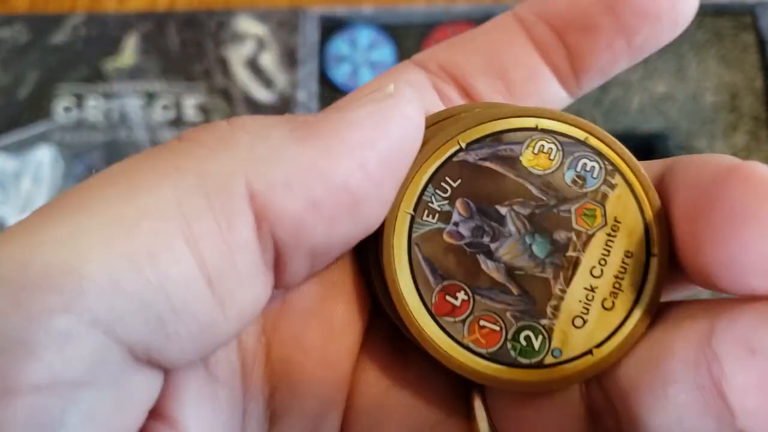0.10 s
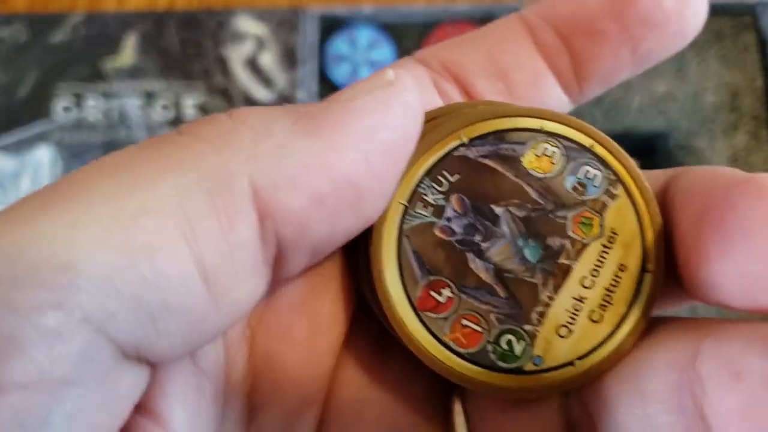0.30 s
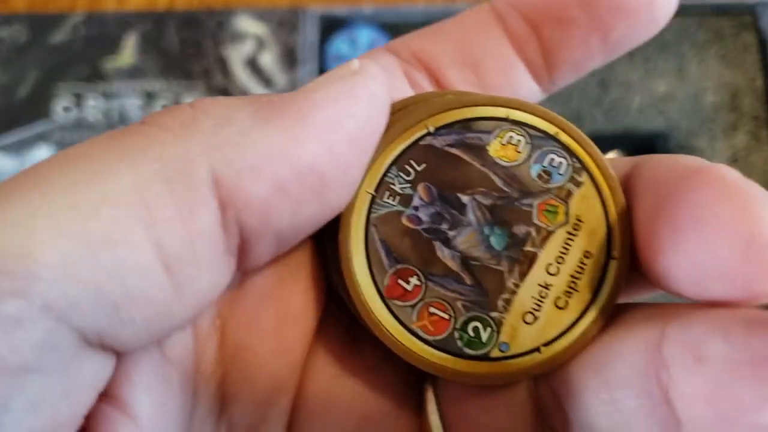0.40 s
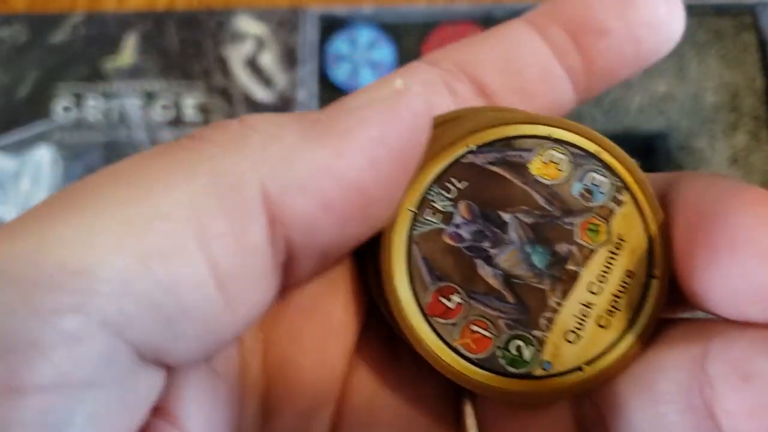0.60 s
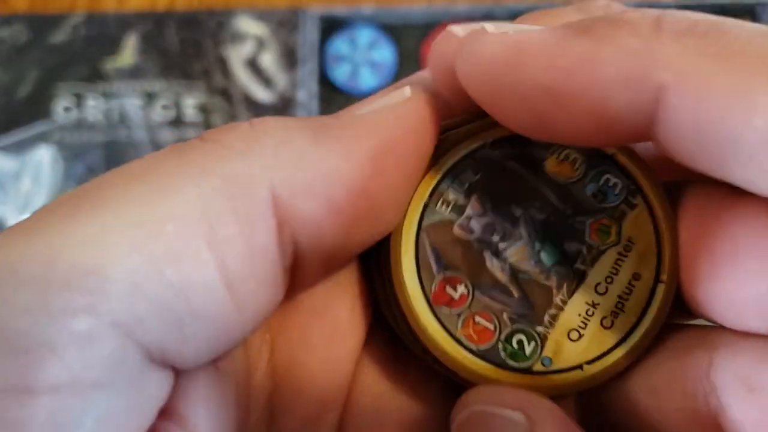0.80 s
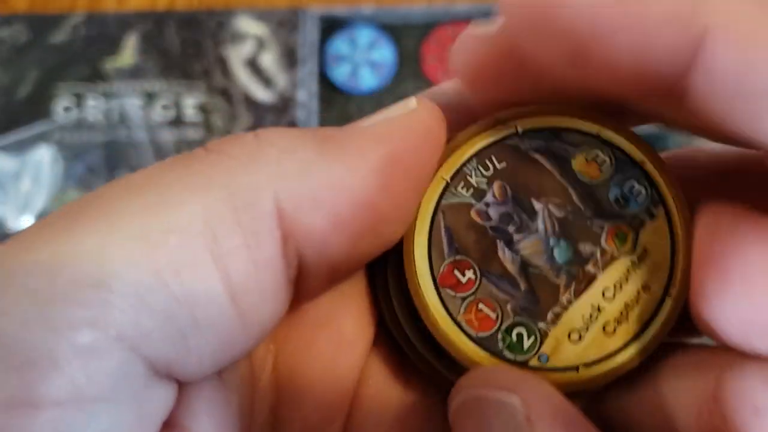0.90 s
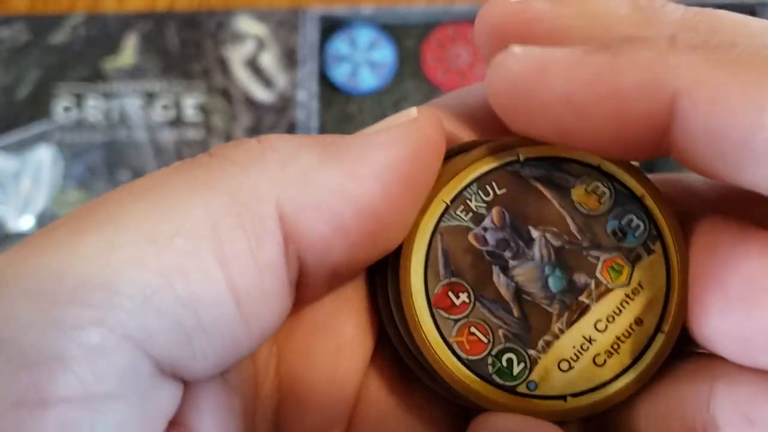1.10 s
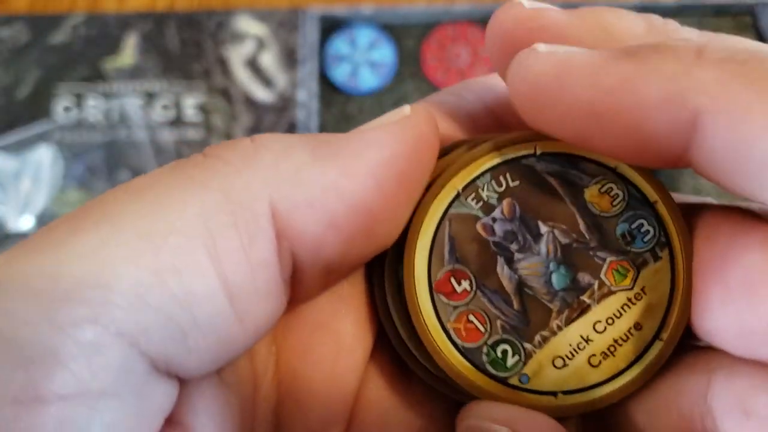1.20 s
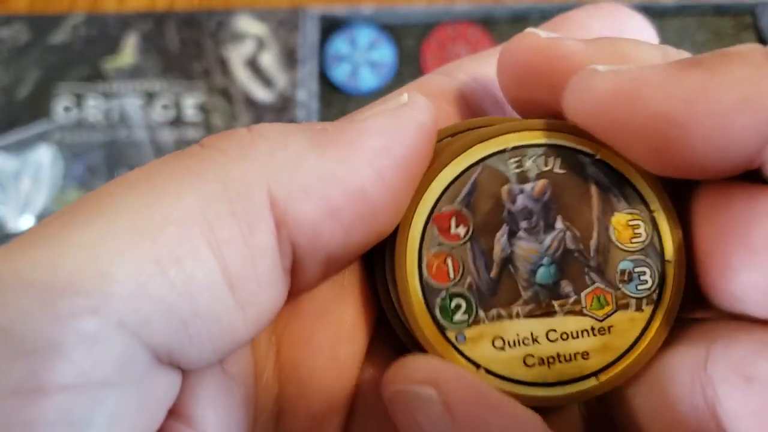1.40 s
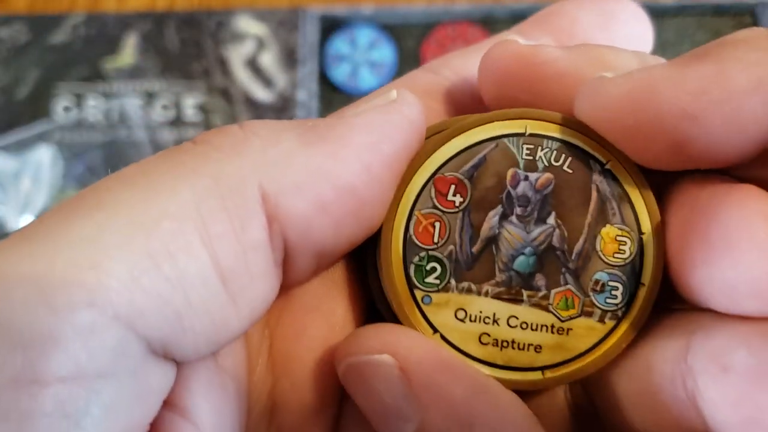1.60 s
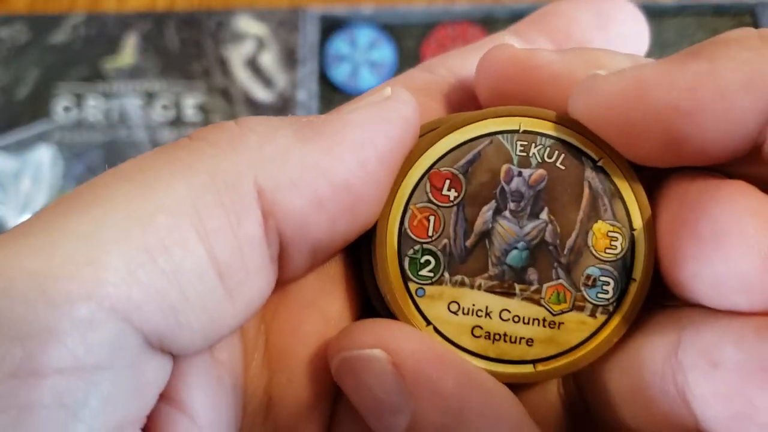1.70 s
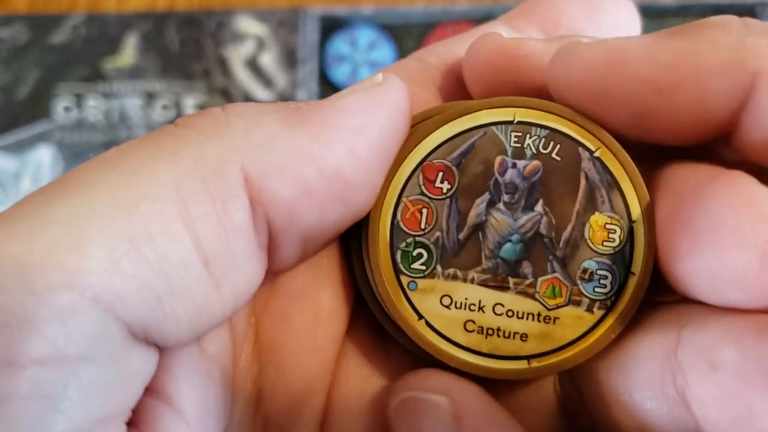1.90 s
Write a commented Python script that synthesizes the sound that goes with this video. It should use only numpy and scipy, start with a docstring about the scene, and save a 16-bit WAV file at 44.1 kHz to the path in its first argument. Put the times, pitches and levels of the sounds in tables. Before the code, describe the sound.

Close up indoors, a heavy plastic chip clacks and chatters to rest on a resonant tabletop; afterwards come very soft rasps of stacked chips, a tiny tick, a finger brush and a sharp short click near the end.

```python
"""A thick plastic chip drops on a table, clacks and rattles to rest: shaped noise bursts and decaying tones.
The table and the room ring on, a low boom swells and dull knocks follow as the chip rocks.
Then chips in a hand-held stack slide softly, with one tiny tick, as grains of noise through resonances,
and a few click together. Fingers brush the stack as swelling hiss, over a low room rumble of coloured
noise and a faint hum."""
import sys
import numpy as np
from scipy import signal
from scipy.fft import rfft, irfft, next_fast_len
from scipy.io import wavfile
from scipy.ndimage import map_coordinates

SR = 44100
rng = np.random.default_rng(int(sys.argv[2]) if len(sys.argv) > 2 else 0)


def inscribe(sig):
    """Save sig as 16-bit PCM at rate SR to the path in sys.argv[1].

    A 1-D sig is mono; a 2-D sig holds one channel per row.
    Samples are clipped to [-1, 1] before scaling.
    """
    pcm = np.round(np.clip(np.atleast_2d(sig).T, -1, 1) * 32767)
    wavfile.write(sys.argv[1], SR, pcm.astype(np.int16))


N = 83790  # length in samples
T = np.arange(N) / SR  # time [s]
M = next_fast_len(N + SR)  # filter length, with spare room for tails
F = np.fft.rfftfreq(M, 1 / SR)  # frequency [Hz]


def amp(db):
    """Turn decibels into gain."""
    return 10 ** (np.asarray(db) / 20)


def unit(x):
    """Scale to an rms of 1."""
    return x / np.sqrt(np.mean(x ** 2) + 1e-20)


def along(points, hz):
    """Read a curve of (Hz, value) points, joined on a log frequency axis."""
    f, v = np.transpose(points)
    return np.interp(np.log(hz + 1), np.log(f + 1), v)


def pan(db):
    """Gains of left and right; positive dB leans left."""
    return amp(np.array([db, -db]) / 2).reshape(2, -1)


def sine(hz, t):
    """A pure tone."""
    return np.sin(2 * np.pi * hz * t)


def add(track, s, sound):
    """Mix a sound into the track at time s."""
    part = track[:, round(s * SR):][:, :sound.shape[-1]]
    part += sound[..., :part.shape[1]]


def filtered(x, response):
    """Pass x through a frequency response."""
    return irfft(rfft(x, M) * response, M)[..., :N]


def peak(hz, width):
    """Gain curve of one resonance."""
    return 1 / (1 + ((F - hz) / width) ** 2)


def causal(gain):
    """Give a gain curve unit energy and minimum phase, so that it rings only after it is struck."""
    c = irfft(np.log(np.maximum(unit(gain), 1e-6)), M)
    c[1:M // 2] *= 2
    c[M // 2 + 1:] = 0
    return np.exp(rfft(c))


# How alike left and right are: (frequency [Hz], likeness [0 to 1])
LIKENESS = [(60, 0.95), (250, 0.92), (600, 0.58), (1200, 0.079), (4000, 0.03), (12000, 0.028)]


def pair(size):
    """White stereo noise: waves from all around are alike in the bass and unrelated in the treble."""
    likeness = along(LIKENESS, np.fft.rfftfreq(size, 1 / SR))
    turn = np.arccos(np.clip(likeness, -1, 1)) / 2
    noise = rfft(rng.standard_normal((2, size)))
    mid, side = irfft(noise * [np.cos(turn), np.sin(turn)], size)
    return np.array([mid + side, mid - side])


def rush(spectrum):
    """Steady coloured stereo noise with an rms of 1."""
    return unit(filtered(pair(size=N), amp(along(spectrum, F))))


# How long the room rings: (frequency [Hz], time to fall 60 dB [s])
ROOM_DECAY = [(100, 0.58), (350, 0.29), (1200, 0.3), (2700, 0.23), (7000, 0.28), (14000, 0.26)]
ROOM_RISE_S = 0.0052


def room():
    """A fresh room tail of unit energy: noise in which each frequency dies at its own speed."""
    hz, t, z = signal.stft(pair(size=32768), SR, nperseg=256)
    fade = amp(-60 * t / along(ROOM_DECAY, hz)[:, None])
    tail = signal.istft(z * fade, SR, nperseg=256)[1]
    tail = tail * (1 - np.exp(-T[:tail.shape[1]] / ROOM_RISE_S))
    return unit(tail) / np.sqrt(tail.shape[1])


def in_room(x, wet_db):
    """A near sound with the room's answer."""
    return x + amp(wet_db) * signal.fftconvolve(x, room(), axes=1)[:, :N]


SAME_PATH = 0.72  # share of the room's energy that contacts have in common
CHATTER_RISE_S = 0.00041
GRAIN_DB, GRAIN_PER_S = 3, 1500  # unevenness of the chatter and rate of its tiny rebounds


def contact(t60, wet_db, common):
    """A hit is a short, uneven chatter of tiny rebounds and near echoes, with the room's answer."""
    tail = np.sqrt(SAME_PATH) * common + np.sqrt(1 - SAME_PATH) * room()
    t = T[:tail.shape[1]]
    rebounds = amp(GRAIN_DB * map_coordinates(rng.standard_normal(4096), [t * GRAIN_PER_S]))
    envelope = amp(-60 * t / t60) * (1 - np.exp(-t / CHATTER_RISE_S))
    chatter = pair(size=len(t)) * rebounds * envelope
    return unit(chatter) / np.sqrt(len(t)) + amp(wet_db) * tail


# Contacts of the dropped chip:
# (time [s], relative clack level [dB], relative table knock level [dB], left over right [dB])
DROPS = [(0.213, -22.5, -20, 6), (0.2217, -29.5, -26.5, -6), (0.2278, -35, -25.5, -7),
         (0.2368, -26.5, -23, 10), (0.2587, -14.5, -19.5, 0), (0.2652, -10, -19, 3),
         (0.2868, -22.5, -26, -4), (0.2998, -19, -24.5, 13), (0.3168, -28, -29.5, 6),
         (0.331, -30, -25.5, -2), (0.3427, -32.5, -22.5, -13), (0.3615, -29.5, -26.5, 0),
         (0.3858, -28, -22.5, 2.5), (0.4134, -27, -29.5, -9), (0.4172, -25, -25, -13),
         (0.4203, -25.5, -27, 12), (0.4367, -25.5, -24.5, -1), (0.4448, -33, -26, 8), (0.4668, -34, -32, 9),
         (.4760, -64, -31, 5), (0.4845, -34.5, -31, 3.5), (.503, -42.5, -39, -3)]
# Colour of the table knock: (frequency [Hz], relative level [dB])
KNOCK = [(30, -41.5), (50, -23), (70, -8.5), (100, -14.5), (150, -8.5), (330, -2), (520, -5), (720, -1.5),
         (1000, -7.5), (1230, -4), (1500, -8), (2050, -4.5), (2750, -8), (3800, -15.5), (5300, -12.5),
         (8500, -33), (14000, -47), (15500, -71.5)]
# Duller tone of flat landings: (frequency [Hz], gain [dB])
FLAT_TONE = [(400, 3), (1300, 2), (2300, -6), (3800, -6.5), (5500, -6.5), (6700, 3.5), (8300, -7.5),
             (14000, -7)]
# Side the table is heard on: (frequency [Hz], left over right [dB])
TABLE_LEAN = [(100, 0.5), (700, .5), (1300, 0.5), (2400, 2), (4400, 2), (15000, -3)]
CLACK_DB, CLACK_T60_S, CLACK_WET_DB = 16, 0.025, -2.5
KNOCK_DB, KNOCK_T60_S, KNOCK_WET_DB = 18, 0.044, 2
EDGE_S, FLAT_CRACK_DB = 0.25, -7  # until EDGE_S the chip lands flat, with less crack


def dropped_chip():
    """Each contact rings the chip and knocks the table; the first ones land flat and sound duller."""
    flat, edge, flat_knocks, edge_knocks = np.zeros((4, 2, N))
    chip_path, table_path = room(), room()
    for s, clack_db, knock_db, pan_db in DROPS:
        clacks, knocks = (flat, flat_knocks) if s < EDGE_S else (edge, edge_knocks)
        clack = contact(CLACK_T60_S, CLACK_WET_DB, chip_path)
        add(clacks, s, amp(clack_db + CLACK_DB) * pan(pan_db) * clack)
        knock = contact(KNOCK_T60_S, KNOCK_WET_DB, table_path)
        add(knocks, s, amp(knock_db + KNOCK_DB) * knock)
    dull = amp(along(FLAT_TONE, F))
    all_knocks = edge_knocks + filtered(flat_knocks, dull)
    table = filtered(all_knocks, causal(amp(along(KNOCK, F)))) + table_ring()
    chip = filtered(flat, dull * chip_colour(FLAT_CRACK_DB)) + filtered(edge, chip_colour(0))
    return chip + filtered(table, pan(along(TABLE_LEAN, F)))


# Resonances of the chip: (frequency [Hz], width [Hz], relative level [dB])
CHIP = [(4775, 200, -15.5), (5780, 86, -5), (6320, 200, -6.5), (6902, 120, 1), (7173, 120, 4),
        (9730, 330, -8.5), (11780, 610, -13)]
# Broad crack of the chip: (frequency [Hz], relative level [dB])
CRACK = [(300, -26), (1200, -17), (2500, -12), (4000, -17), (5200, -15), (6500, -14.5), (7500, -9),
         (8800, -34.5), (9800, -20.5), (14400, -24.5), (15000, -38), (16000, -44)]
# Side the chip is heard on: (frequency [Hz], left over right [dB])
CHIP_LEAN = [(1000, 3), (2500, 2), (6800, 0.5), (9800, -6.5), (13000, -0.5)]


def chip_colour(crack_db):
    """The chip's damped resonances stand out of a broad crack."""
    ring = sum((amp(db) * peak(hz, width)) ** 2 for hz, width, db in CHIP)
    crack = amp(along(CRACK, F) + crack_db)
    return causal(np.sqrt(crack ** 2 + ring)) * pan(along(CHIP_LEAN, F))


# Ways the table vibrates: (frequency [Hz], average relative level [dB], time to fall 60 dB [s])
TABLE = [(239.4, -4, 0.19), (277, -2.5, 0.14), (350.2, -1, 0.44), (408.3, -6, 0.63), (482, -9.5, 0.22),
         (556, -9, 0.16), (630, -8, .22), (686, -7, 0.35), (740, -7.5, 0.27), (859, -7.5, 0.36),
         (1247, -10, 0.19), (2000, -9.5, .16)]
TABLE_DB = -36.5
THUD_HZ, THUD_DB, THUD_T60_S = 133.9, -32.5, 0.66  # the first landing sets the table top swinging
BANG_S, BANG_HZ, BANG_DB, BANG_T60_S = 0.29, 1250, -23.5, 0.076  # one table tone rings out strongly


def table_ring():
    """Every knock sets the table's modes ringing, each a sine that dies away."""
    ring, t = np.zeros((2, N)), T[:SR]
    for s, clack_db, knock_db, pan_db in DROPS:
        modes = 0
        for hz, db, t60 in TABLE:
            level = amp(db + rng.normal(0, 1.8) - 60 * t / t60)
            modes = modes + level * np.sin(2 * np.pi * (hz * t + rng.random()))
        add(ring, s, amp(knock_db + KNOCK_DB + TABLE_DB) * modes * (1 - np.exp(-t / 0.0012)))
    thud = amp(THUD_DB - 60 * t / THUD_T60_S) * sine(THUD_HZ, t)
    add(ring, DROPS[0][0], thud * (1 - np.exp(-t / 0.003)))
    add(ring, BANG_S, amp(BANG_DB - 60 * t / BANG_T60_S) * sine(BANG_HZ, t))
    return ring


# Colour of the snap: (frequency [Hz], relative level [dB])
SNAP = [(500, -15.5), (2500, -4), (5000, -6), (7000, 7), (8600, -20), (10000, -3), (12000, -6.5),
        (14400, -8), (15200, -25)]
# The chip's clear ring, heard directly:
# (average frequency [Hz], level relative to the clack [dB], time to fall 60 dB [s])
PING = [(6380, -8, .012), (7074, -4.5, 0.025)]
SNAP_DB, SNAP_T60_S = -1, 0.0022  # the bright instant of contact
PING_SCATTER = 0.014  # share by which its pitch differs between contacts


def snaps():
    """Each contact begins with a sharp, bright burst and a short, clear ring of the chip."""
    snap, ping, t = np.zeros((2, N)), np.zeros((2, N)), T[:2048]
    for s, clack_db, knock_db, pan_db in DROPS:
        burst = unit(rng.standard_normal((2, len(t))) * amp(-60 * t / SNAP_T60_S)) / np.sqrt(len(t))
        add(snap, s, amp(SNAP_DB + clack_db) * pan(pan_db) * burst)
        pitch = 1 + PING_SCATTER * rng.standard_normal()
        tones = sum(amp(db - 60 * t / t60) * sine(hz * pitch, t) for hz, db, t60 in PING)
        add(ping, s, amp(clack_db) * pan(pan_db) * tones)
    return ping + filtered(snap, causal(amp(along(SNAP, F))) * pan(along(CHIP_LEAN, F)))


# Two low tones: (frequency [Hz], level before swell and fade [dB])
BOOM = [(307, -31.5), (347, -38.5)]
BOOM_S, BOOM_RISE_S, BOOM_T60_S = 0.345, 0.029, 0.76


def boom():
    """A low resonance of two tones builds up under the rattle, beats and outlasts it."""
    t = np.maximum(T - BOOM_S, 0)
    modes = sum(amp(db) * sine(hz, t) for hz, db in BOOM)
    return modes * (1 - np.exp(-t / BOOM_RISE_S)) * amp(-60 * t / BOOM_T60_S)


# The chip rocks dully as it comes to rest: (time [s], relative level [dB])
LATE = [(.594, -49), (0.652, -52), (0.715, -55), (0.773, -64.5), (.803, -60.5), (0.833, -66.5)]
# Colour of these knocks: (frequency [Hz], relative level [dB])
ROCK = [(150, -26), (310, -7), (410, -6.5), (600, -23), (950, -29), (1450, -31), (1750, -24.5), (2300, -28),
        (3500, -48), (9000, -45.5)]
# Their narrow ring: (frequency [Hz], width [Hz], relative level [dB])
ROCK_RING = [(1174, 63, -11), (1320, 75, -17)]
ROCK_DB, ROCK_T60_S, ROCK_WET_DB = 23, 0.084, -7


def rocking():
    """Faint knocks after the rattle: dull noise bursts with two narrow resonances."""
    out, path = np.zeros((2, N)), room()
    for s, db in LATE:
        add(out, s, amp(db + ROCK_DB) * contact(ROCK_T60_S, ROCK_WET_DB, path))
    ring = sum(amp(db) * peak(hz, width) for hz, width, db in ROCK_RING)
    return filtered(out, causal(amp(along(ROCK, F)) + ring))


# Slides and one tiny tick (at 1.091 s) in the held stack: (time [s], length before the fade [s],
# relative rim rasp level [dB], rim frequency [Hz], relative hollow body level [dB], body frequency [Hz])
STACK_MOVES = [(0.908, 0.026, -73, 4360, -59.5, 2110), (0.933, 0.011, -60, 4570, -74, 1790),
               (0.911, 0.038, -66.5, 4820, -74, 865), (0.974, 0.04, -69.5, 5010, -92, 2040),
               (1.049, 0.023, -79, 5050, -93.5, 2040), (1.091, 0.0018, -69, 7200, -88, 2090),
               (1.193, 0.024, -65.5, 4875, -70, 870), (1.413, 0.034, -71.5, 4920, -83.5, 980),
               (1.474, 0.039, -67, 5050, -75.5, 970), (1.506, 0.026, -70.5, 5070, -88, 1100),
               (1.695, 0.0081, -83, 4990, -77.5, 1150)]
# Colour of the rasp: (frequency [Hz], relative level [dB])
RASP = [(500, -28), (900, -47), (1500, -30.5), (2300, -16), (3000, -29), (4000, -21.5), (6000, -33),
        (7100, -9), (8400, -34), (9800, -20), (13000, -37)]
GRAINS_PER_S, MOVE_FALL_S, MOVE_WET_DB = 3000, 0.011, -14.5
MOVE_RISE = 0.45  # share of the length spent swelling
RIM_WIDTH_HZ, HOLLOW_Q = 224, 8.6


def slides_and_tick():
    """Tiny slips, and one tick, excite the chip rims and the hollow of the hand; both shift with the grip."""
    out = np.zeros((2, N))
    for s, length, rasp_db, rim_hz, body_db, body_hz in STACK_MOVES:
        swell = np.clip((T - s) / (MOVE_RISE * length), 0, 1)
        stroke = swell * np.exp(-np.maximum(T - s - length, 0) / MOVE_FALL_S)
        grains = (rng.random(N) < GRAINS_PER_S / SR) * rng.standard_normal((2, N))
        slips = stroke * unit(grains)
        rim = causal(amp(along(RASP, F)) + peak(rim_hz, RIM_WIDTH_HZ))
        body = causal(peak(body_hz, body_hz / HOLLOW_Q))
        out += filtered(slips, amp(rasp_db) * rim + amp(body_db) * body)
    return in_room(out, MOVE_WET_DB)


# Held chips snap together: (time [s], relative level [dB])
CLICKS = [(1.095, -82), (1.703, -81), (1.8677, -58.5), (1.871, -37)]
# Short ring of the held chips: (frequency [Hz], relative level [dB], time to fall 60 dB [s])
HELD = [(939, -24, 0.0098), (1807, -2.5, 0.0053), (2143, 0, 0.0074), (2680, -21, 0.014),
        (4930, -11.5, 0.024), (7040, -16.5, 0.02), (10100, -27.5, 0.0062)]
# Colour of their crack: (frequency [Hz], relative level [dB])
CLICK_CRACK = [(200, -38), (450, -21.5), (800, 1), (2300, -3), (3000, -4.5), (4100, -25), (5400, -8.5),
               (6400, -14), (8500, -37.5), (10000, -28), (15000, -32.5)]
CLICK_CRACK_DB, CLICK_CRACK_T60_S = -7, 0.014
CLICK_TAIL_DB, CLICK_TAIL_T60_S = -31, 0.23  # the crack's scattered echoes
CLICK_PAN_DB, CLICK_WET_DB = 12.5, -13.5


def clicks():
    """The hand damps the held chips, so they crack and ring only briefly."""
    ring, crack, t = np.zeros((2, N)), np.zeros((2, N)), T[:SR // 5]
    fade = amp(CLICK_CRACK_DB - 60 * t / CLICK_CRACK_T60_S)
    fade = fade + amp(CLICK_TAIL_DB - 60 * t / CLICK_TAIL_T60_S)
    # every other tone starts downwards
    tones = sum((-1) ** k * amp(db - 60 * t / t60) * sine(hz, t) for k, (hz, db, t60) in enumerate(HELD))
    for s, level_db in CLICKS:
        add(ring, s, amp(level_db) * tones)
        add(crack, s, amp(level_db) * fade * rng.standard_normal((2, len(t))))
    out = ring + filtered(crack, causal(amp(along(CLICK_CRACK, F))))
    return in_room(out * pan(CLICK_PAN_DB), CLICK_WET_DB)


# Fingers on the stack: (time [s], fade time constant [s], level before the fade [dB])
BRUSHES = [(.775, .13, -73.5), (1.693, 0.037, -59.5)]
# Colour of the skin's hiss: (frequency [Hz], relative level [dB])
SKIN = [(500, -2.5), (1200, -5.5), (3000, -3), (8500, -12), (10000, 7), (11800, 14), (14400, 12.5),
        (15200, -22)]
# Soft bumps of the hands: (time of the middle [s], width [s], peak level [dB])
HANDLING = [(1.023, 0.029, -61), (1.315, 0.054, -59)]
# Colour of the bumps: (frequency [Hz], relative level [dB])
BUMP = [(25, -36), (55, 1), (78, -8), (110, -3.5), (250, -42.5), (1000, -89)]


def hands(rise_s=0.0086):
    """Skin hisses over the chips and the hands bump softly: noise that swells and fades."""
    brush, bump = np.zeros(N), np.zeros(N)
    for s, fade_s, db in BRUSHES:
        swell = np.clip((T - s) / rise_s, 0, 1)
        brush += amp(db) * swell * np.exp(-np.maximum(T - s, 0) / fade_s)
    for s, width, db in HANDLING:
        bump += amp(db) * np.exp(-((T - s) / width) ** 2 / 2)
    return brush * rush(SKIN) + bump * rush(BUMP)


# Colour of the rumble and hiss: (frequency [Hz], relative level [dB])
FLOOR = [(20, -16), (45, -7), (70, 1.5), (120, 0.5), (170, -14), (260, -18), (450, -23), (1000, -30.5),
         (3000, -33.5), (6000, -37.5), (7200, -30.5), (8500, -39), (11000, -32.5), (14400, -29),
         (14900, -55.5)]
FLOOR_DB, HUM_HZ, HUM_DB = -66.5, 214.4, -78


def background():
    """Room rumble and microphone hiss are steady noise; a faint hum is one sine."""
    return amp(FLOOR_DB) * rush(FLOOR) + amp(HUM_DB) * unit(sine(HUM_HZ, T))


def scene():
    """All sources together."""
    chip = dropped_chip() + snaps() + boom() + rocking()
    stack = slides_and_tick() + clicks() + hands()
    return chip + stack + background()


# The microphone's treble falls away: (frequency [Hz], gain [dB])
MIC = [(14200, -0.5), (14800, -10.5), (16300, -17.5)]
TOP_HZ = 16300


def record(dry):
    """The microphone dulls the top and a steep band limit removes nearly all above TOP_HZ."""
    limit = 1 / (1 + (F / TOP_HZ) ** 120)
    return filtered(dry, amp(along(MIC, F)) * limit)


dry = scene()
out = record(dry)
inscribe(out)
```